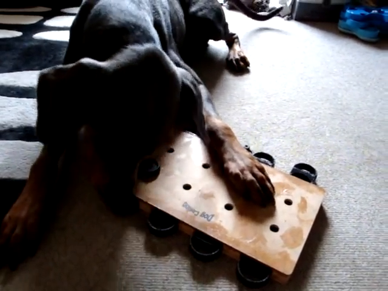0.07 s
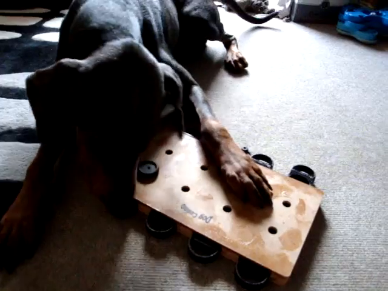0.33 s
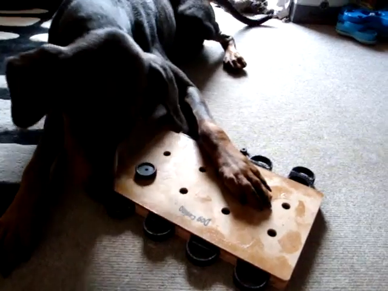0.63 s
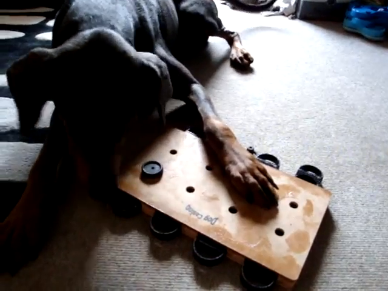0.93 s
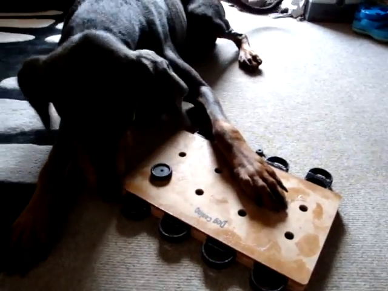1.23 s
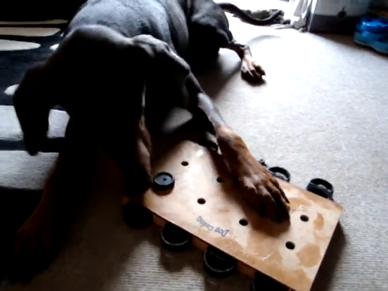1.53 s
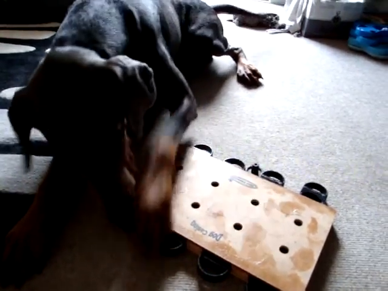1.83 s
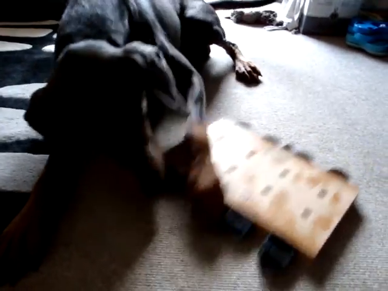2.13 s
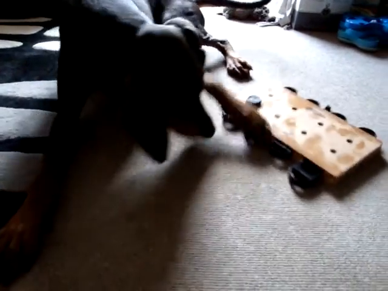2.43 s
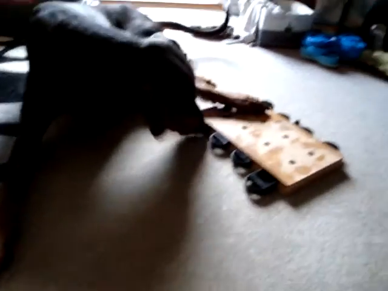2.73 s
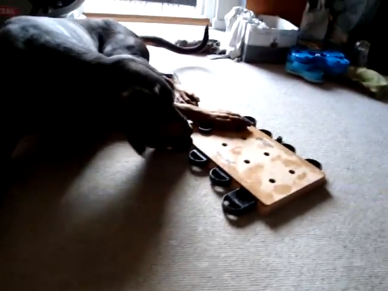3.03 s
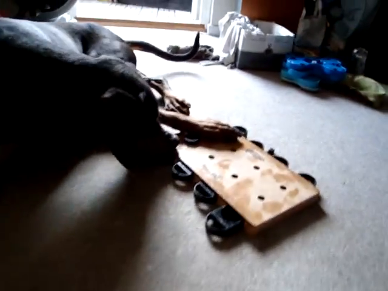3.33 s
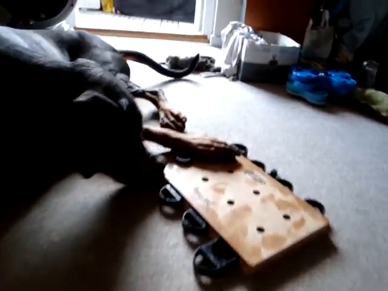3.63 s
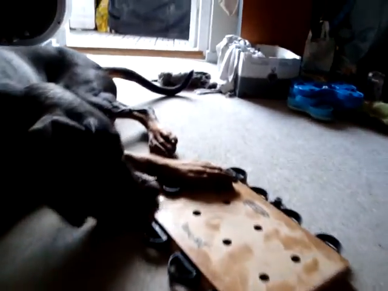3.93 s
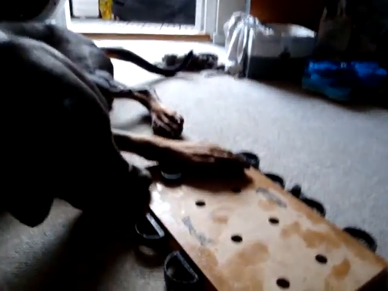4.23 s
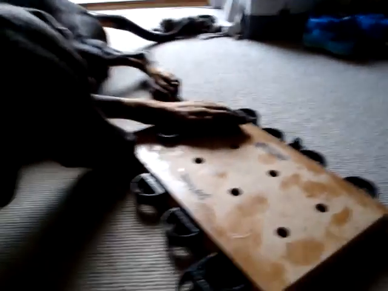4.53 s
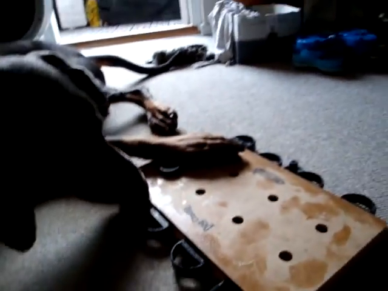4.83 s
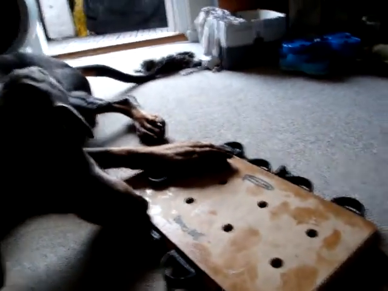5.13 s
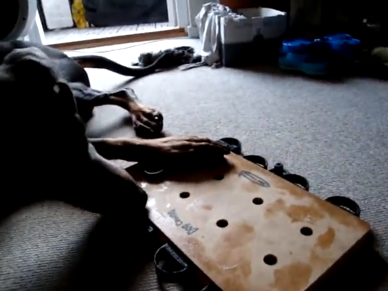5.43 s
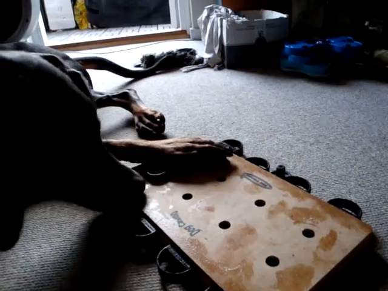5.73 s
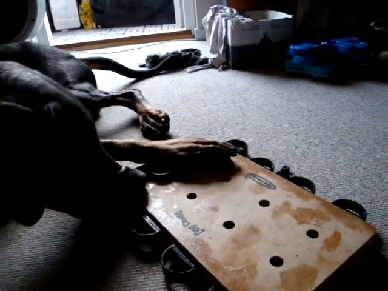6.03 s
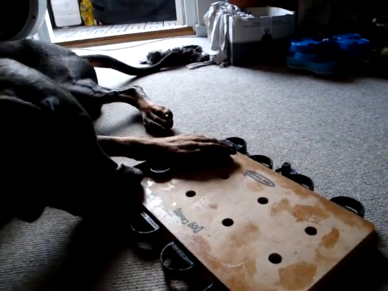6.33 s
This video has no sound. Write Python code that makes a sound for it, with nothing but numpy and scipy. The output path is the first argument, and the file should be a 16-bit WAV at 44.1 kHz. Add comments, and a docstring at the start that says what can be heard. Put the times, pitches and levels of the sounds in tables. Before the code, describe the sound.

A dog works at a wooden treat puzzle close by in a small carpeted room, over a faint steady hiss. In the first second there is a soft puff of breath and a few light clicks of plastic drawers against the board. A very faint, falling nose whistle comes at about 1.1 seconds, then snuffles around 1.5. Near 1.9 seconds a paw swipe makes a sharp snap and sets a plastic cup ringing briefly. The board slides over the carpet with a low rumble and a loud clatter of drawers until about 2.5 seconds, followed by soft paw brushes. Two hard snaps come at 3.2 and 3.5 seconds, and a cluster of knocks just after 4. Sparser clicks follow, with quiet snuffles around 5.4. Another snap at 6 seconds leads into a puff of breath and several more clicks, up to about 6.5 seconds.

```python
"""A dog works at a wooden treat puzzle on the carpet of a small room.
First it snuffles, clicks the plastic drawers against the board with its nose, and whistles faintly.
Near 2 s a paw swipe rings a plastic cup and shoves the board away with all drawers rattling.
The carpet stops the board, paws brush the pile, and the clicks and snuffles go on to the end.
A limiter briefly turns the sound down on the hardest snaps; a faint hiss lies under it all."""
import sys
import numpy as np
from scipy import signal
from scipy.fft import rfft, irfft
from scipy.io import wavfile
from scipy.ndimage import uniform_filter1d, minimum_filter1d

SR = 44100
rng = np.random.default_rng(int(sys.argv[2]) if len(sys.argv) > 2 else 0)


def wav_out(sig):
    """Save sig, one row per channel (or a flat mono array), as 16-bit PCM at SR to the path in sys.argv[1]."""
    wavfile.write(sys.argv[1], SR, np.round(np.clip(np.atleast_2d(sig).T, -1, 1) * 32767).astype(np.int16))


N = 285768

# Drawers knocking on the board. Body is the low part of a knock, compared with its main ring.
# start_s, pitch_hz, level_db, body_db, hardness_db_per_octave
DRAWER_KNOCKS = [(0.338, 1520, -66.5, 15.5, 5), (0.507, 1453, -31, -0.5, -8),
                 (0.6312, 1440, -40.5, -6.5, -9), (0.641, 1300, -33.5, -10, -14.5),
                 (0.8807, 1532, -32.5, -9.5, -7.5), (0.9546, 1466, -38.5, -11, -13),
                 (0.9664, 1354, -34, -6.5, -13), (1.8722, 1600, -34, -5, -10), (1.893, 1510, -29.5, 3.5, 4),
                 (1.899, 1534, -35.5, -13, 2.5), (1.935, 1540, -36.5, -20, -2),
                 (1.9727, 1430, -31.5, 4.5, -15), (2.0322, 1543, -27, -0.5, -7.5),
                 (2.0582, 1400, -30, 4, 2.5), (2.0693, 1266, -17.5, -4, -3.5),
                 (2.0771, 1454, -26.5, 3, 2.5), (2.0839, 1490, -41, 4, 0), (2.1001, 1217, -34.5, 13.5, -15),
                 (2.1199, 1350, -31.5, 5, -1), (2.1647, 1330, -27, 2, -7), (2.1933, 1310, -32.5, -2, -2.5),
                 (2.1991, 1790, -17.5, -2, -8), (2.2133, 1590, -26.5, -8, -7.5),
                 (2.2813, 1234, -37, 4.5, -15), (2.3155, 1448, -24.5, 0, -24),
                 (2.372, 1294, -38.5, 4.5, -18), (2.452, 1160, -27, -16.5, -12),
                 (2.459, 1596, -24.5, -12, -10.5), (2.4636, 1507, -28, -13, -15),
                 (2.483, 1350, -35.5, -4.5, -14), (2.643, 1350, -35, 5.5, -0.5),
                 (2.6655, 1537, -30, -15, -5.5), (2.7474, 1500, -29, -16, -5.5),
                 (3.0743, 1313, -39, -5, -15.5), (3.179, 1220, -44, -8, 0), (3.343, 1270, -50, -2, -16),
                 (3.361, 1446, -31, -15, -13), (3.366, 1458, -24.5, -27, -12),
                 (3.3717, 1335, -31, -8, -10.5), (3.425, 1310, -49, 9, -3), (3.758, 1494, -55, 10, -2),
                 (3.79, 1500, -52, 7.5, -9), (3.9543, 1516, -31.5, -17, -0.5),
                 (3.967, 1430, -43.5, 8.5, -15), (4.008, 1430, -41.5, 3, -13), (4.025, 1446, -32, -1, -3.5),
                 (4.1147, 1428, -17, -7, -9.5), (4.1283, 1426, -22.5, -26, -7),
                 (4.1762, 1434, -31.5, -10, -13), (4.2391, 1490, -26, -17.5, -14.5),
                 (4.4941, 1490, -31.5, -11.5, -6), (4.5358, 1357, -43.5, -4, -8),
                 (4.9853, 1630, -24, -14.5, -2.5), (5.0972, 1210, -47, 2.5, 1),
                 (5.1066, 1435, -35, -4.5, -12.5), (5.4558, 1440, -33, 1, -7.5),
                 (5.85, 1354, -53, 10.5, -6), (5.9869, 1500, -53, 11, -8), (6.047, 1375, -32, -13, -6),
                 (6.1058, 1425, -37.5, -4.5, -9.5), (6.2919, 1440, -22, -11.5, -15.5),
                 (6.3657, 1330, -30.5, 0, -0.5), (6.4614, 1390, -32, -7.5, -19),
                 (6.4757, 1460, -34, -15, -30)]
# Drawers snapping hard against their stops: same columns.
DRAWER_SNAPS = [(1.8769, 1495, -16.5, -3, 2.5), (3.183, 1361, -15, -8, 0), (3.4994, 1409, -16, -9, -0.5),
                (6.0304, 1530, -23.5, -8, 3.5)]
def drawers():
    """All the knocks and snaps, as they sound in one direction."""
    out = np.zeros(N)
    for start_s, pitch_hz, level_db, *blow in DRAWER_KNOCKS:
        tone = blow_tone(*blow, clack_db=2.5, tick_db=-5.5)
        hit = knock(pitch_hz, level_db, tone, crack_db=2.5, crack_s=0.0022, press_s=0.00029, touch_db=-17)
        add(out, start_s - TOUCH_SAMPLES / SR, hit)
    for start_s, pitch_hz, level_db, *blow in DRAWER_SNAPS:
        tone = blow_tone(*blow, clack_db=0.5, tick_db=1)
        hit = knock(pitch_hz, level_db, tone, crack_db=8.5, crack_s=0.0019, press_s=0.00014, touch_db=-20)
        add(out, start_s - TOUCH_SAMPLES / SR, hit)
    return out


def blow_tone(body_db, hardness, clack_db, tick_db, tick_octaves=1.37):
    """Levels of a blow's body, ring, clack and tick, low to high: harder blows are brighter."""
    return np.array([body_db, 0, clack_db + hardness, tick_db + tick_octaves * hardness])


TOUCH_SAMPLES = 130  # from a drawer's first touch to its blow
# Borders of the body, ring, clack and tick bands: edge_hz
KNOCK_BANDS = [330, 1050, 2000, 4200, 10500]
# The tones a drawer rings with, main one first: pitch_hz, level_db, ring_s (time to fade by 60 dB)
DRAWER_TONES = [(1447, 7.5, 0.024), (408, -14, 0.014), (617.4, -5.5, 0.044), (710, -8.5, 0.031),
                (868, -2.5, 0.041), (986.4, -4, 0.049), (1176, -0.5, 0.021), (1746, 1.5, 0.018),
                (1955, -1.5, 0.014), (2288, 2, 0.016), (2566, 4.5, 0.014), (2922, 3.5, 0.016),
                (3373, -5.5, 0.028), (3780, 5.5, 0.0081), (4397, 2.5, 0.012), (5396, 5, 0.0083),
                (6700, -33, 0.0059), (7860, -1, 0.009)]
def knock(pitch_hz, level_db, tone_db, crack_db, crack_s, press_s, touch_db, size=1918):
    """A loose drawer touches lightly, then lands with a short crack and rings."""
    t = np.arange(size) / SR
    crack = signal.lfilter([1], [1, -.45], rng.standard_normal(size)) * np.exp(-t / crack_s)
    tuned = np.array(DRAWER_TONES) * [pitch_hz / DRAWER_TONES[0][0], 1, 1]
    rings = ring(tuned, spread_db=2.5, detune=0.043, size=size)
    press = 1 - np.exp(-t / press_s)  # the force builds up as the parts meet
    hit = np.pad(press * (rings + amp(crack_db) * crack), (TOUCH_SAMPLES, 0))
    add(hit, 0, amp(touch_db) * rings * np.minimum(t * SR / TOUCH_SAMPLES, 1))
    # Split the hit into four bands of equal energy, then give each its level.
    hz = np.fft.rfftfreq(len(hit), 1 / SR)
    low_passes = [1 / (1 + (hz / edge_hz) ** 8) for edge_hz in KNOCK_BANDS]
    bands = irfft(rfft(hit) * np.diff(low_passes, axis=0), len(hit))
    bands /= np.sqrt((bands ** 2).sum(1, keepdims=True) / (.01 * SR))
    return amp(level_db + tone_db) @ bands


# The low tones of the whole board on the carpet: pitch_hz, level_db, ring_s
BOARD_TONES = [(85.6, -24.5, 0.11), (112, -12.5, 0.073), (151.6, 2, 0.1), (206.7, 0, 0.31), (260, 0, 0.071),
               (301.6, 5.5, 0.077), (341, 5, 0.12), (378.6, 8.5, 0.074), (415, 1, 0.084)]
def board(stir_db=-27, thud_db=-28.5, thud_s=0.0016):
    """Knocks set the board ringing faintly; hard snaps give it a dull push."""
    out = np.zeros(N)
    low_ring = ring(BOARD_TONES, spread_db=0, detune=0.029)
    for start_s, _, level_db, body_db, _ in DRAWER_KNOCKS:
        add(out, start_s, amp(level_db + body_db + stir_db) * low_ring)
    t = np.arange(SR // 10) / SR
    for start_s, *_ in DRAWER_SNAPS:
        add(out, start_s, -amp(thud_db) * np.exp(-t / thud_s))
    return out


# Jolts that shake the loose drawers: peak_s, fade_s, level_db
DRAWER_JOLTS = [(1.616, 0.017, -43.5), (1.897, 0.014, -38), (2.05, 0.055, -22.5), (2.2, 0.035, -27.5),
                (2.465, 0.048, -31), (2.69, 0.041, -40)]
# The rattle's tone, low to high: pitch_hz, level_db
RATTLE_SPECTRUM = [(200, -23), (400, -13), (530, -21), (640, 3.5), (850, 12), (1200, 6), (1700, -1),
                   (2200, -3), (2750, -0.5), (3500, -5), (6000, -23), (10000, -7)]
def shove(speed, rumble_db=-32.5, rattle_db=-33):
    """The sliding board rumbles and its drawers rattle, more with speed and at each jolt."""
    judder = patter(BOARD_TONES, per_s=300, spread_db=3, detune=.012, spots=5)
    chatter = patter(DRAWER_TONES, per_s=500, spread_db=5, detune=.07, spots=9)
    jolts = sum(amp(level_db) * swell(peak_s, 0.44 * fade_s, fade_s, roundness=1.05)
                for peak_s, fade_s, level_db in DRAWER_JOLTS)
    rumble = colour(judder, [(30, -31), (70, -5), (120, -2), (270, -8), (430, -4), (600, -4), (1200, -9)])
    rattle = colour(chatter, RATTLE_SPECTRUM)
    return rumble * amp(rumble_db) * speed ** 0.46 + rattle * (amp(rattle_db) * speed + jolts)


def slide_speed(start_s=1.962, push_s=0.059, stop_s=2.388):
    """The board's speed, from 0 to 1: the paw speeds it up, then the carpet brakes it."""
    return np.interp(np.arange(N) / SR, [start_s, start_s + push_s, stop_s], [0, 1, 0])


# Paws and legs brushing the carpet: peak_s, rise_s, level_db
PAW_BRUSHES = [(1.926, 0.013, -35.5), (2.418, 0.023, -35.5), (2.502, 0.076, -47.5), (2.619, 0.016, -39.5),
               (2.685, 0.048, -44)]
# The tone of rubbed carpet: pitch_hz, level_db
CARPET_SPECTRUM = [(700, -15), (1500, -0.5), (2500, -3.5), (4000, -4.5), (6000, -10), (8000, -11),
                   (10000, -18.5)]
def carpet_rub(speed, slide_db=-37):
    """The carpet hisses as the board and the paws rub over it."""
    brushes = sum(amp(level_db) * swell(peak_s, rise_s, rise_s, roundness=3.3)
                  for peak_s, rise_s, level_db in PAW_BRUSHES)
    return noise(CARPET_SPECTRUM) * (amp(slide_db) * speed ** 0.12 + brushes)


# The tones of a plastic cup: pitch_hz, level_db, ring_s
CUP_TONES = [(1030, -11, 0.15), (2620, -3, 0.17), (2640, 0, 0.18), (3380, -12, .14)]
def cup(swipe_s=1.879, level_db=-22):
    """The paw's first swipe leaves a cup ringing."""
    out = np.zeros(N)
    add(out, swipe_s, amp(level_db) * ring(CUP_TONES, spread_db=5, detune=0.0024))
    return out


# Puffs of breath: peak_s, rise_s, flow_db, hiss_db
NOSE_PUFFS = [(0.006, 0.076, -46, -57.5), (1.376, 0.034, -48.5, -53.5), (1.46, 0.14, -52, -58),
              (1.612, 0.016, -34.5, -47), (1.807, 0.013, -49, -48), (5.23, .06, -49.5, -58),
              (5.374, 0.087, -43.5, -56), (5.509, 0.03, -47, -60), (6.194, 0.021, -46, -51.5)]
# The tone of air flowing in the muzzle, and hissing in the nostrils: pitch_hz, level_db
MUZZLE_SPECTRUM = [(88, -48), (150, -13), (266, -5), (336, -4.5), (431, -12), (670, -0.5), (925, -1),
                   (1060, 0), (1340, 0.5), (2230, -4), (2780, -1.5), (5000, -13.5), (6500, -43),
                   (11000, -120)]
NOSTRIL_SPECTRUM = [(2500, -34), (4200, 0.5), (6000, -5), (8000, -5), (10000, -13)]
def snuffles(flutter_db=2.4):
    """Puffs of air flutter through the dog's nose, pressed against the board."""
    flutter = amp(flutter_db * wobble(smooth_samples=400))
    flow, hiss = noise(MUZZLE_SPECTRUM), noise(NOSTRIL_SPECTRUM)
    out = np.zeros(N)
    for peak_s, rise_s, flow_db, hiss_db in NOSE_PUFFS:
        puff = swell(peak_s, rise_s, 1.12 * rise_s, roundness=1.66)
        out += puff * (amp(flow_db) * flow + amp(hiss_db) * hiss)
    return flutter * out


def nose_whistle(peak_s=1.09, rise_s=.075, pitch_hz=1770, sag_hz_per_s=850, waver_hz=25, level_db=-56):
    """A thin tone in the dog's nose sinks as the air runs out."""
    hz = pitch_hz - sag_hz_per_s * (np.arange(N) / SR - peak_s)
    hz += waver_hz * wobble(smooth_samples=300)
    tone = np.sin(2 * np.pi * np.cumsum(hz) / SR)
    return amp(level_db) * swell(peak_s, rise_s, rise_s, roundness=2) * tone


# How long the room rings: pitch_hz, ring_s
ROOM_RING = [(150, 0.085), (600, 0.27), (1500, 0.23), (3500, 0.26), (9000, 0.46)]
# Echoes off the floor and furniture: delay_s, level_db
NEAR_ECHOES = [(.0042, -20), (0.011, -41), (0.0154, -38)]
def room(direct, sides, tail_db=-15.5, build_s=0.0035):
    """A few near echoes; sound sent sideways returns as a short tail, dulled by the carpet."""
    shape = (len(sides), SR // 2)
    bounces = rng.standard_normal(shape) * (rng.random(shape) < .3)
    hz, t, spectrum = signal.stft(bounces, SR, nperseg=256)
    dulling = amp(curve([(100, 11), (1200, 5), (3000, 2.5), (6000, -7), (10000, -18.5)], hz))
    fade = amp(-60 * t / curve(ROOM_RING, hz)[:, None])
    tails = signal.istft(spectrum * dulling[:, None] * fade, SR, nperseg=256)[1]
    tails *= 1 - np.exp(-(np.arange(tails.shape[1]) / SR / build_s) ** 2)
    tails *= amp(tail_db) / np.linalg.norm(tails)
    out = direct + signal.oaconvolve(sides, tails, axes=1).sum(0)[:N]
    for delay_s, level_db in NEAR_ECHOES:
        add(out, delay_s, amp(level_db) * direct)
    return out


# The tone of the quiet background: pitch_hz, level_db
BACKGROUND_SPECTRUM = [(7.1, -48), (12, -18), (43, -25), (65, -13), (174, -3), (224, -6.5), (440, -4),
                       (479, -2.5), (751, -2.5), (968, -5.5), (1050, -4), (1700, -6), (2190, -8.5),
                       (5090, -12), (10000, -19), (13000, -64.5), (22000, -120)]
def background_hiss(level_db=-54.5):
    """A faint, steady hiss."""
    return amp(level_db) * noise(BACKGROUND_SPECTRUM)


def ring(tones, spread_db, detune, size=6000):
    """One blow: where it lands sets the strength, sign and exact pitch of each fading tone."""
    hz, level_db, ring_s = np.transpose(tones)[:, :, None]
    strength, side, pitch = rng.standard_normal((3, len(tones), 1))
    t = np.arange(size) / SR
    fades = amp(level_db + spread_db * strength - 60 * t / ring_s)
    waves = np.sin(2 * np.pi * hz * (1 + detune * pitch) * t)
    return (np.sign(side) * fades * waves).sum(0)


def patter(tones, per_s, spread_db, detune, spots):
    """Many small blows of uneven size, landing on several spots."""
    out = np.zeros(N)
    for _ in range(spots):
        lands = rng.random(N) < per_s / spots / SR
        blows = lands * amp(spread_db * np.clip(rng.standard_normal(N), -2, 2))
        out += signal.oaconvolve(blows, ring(tones, spread_db=2.5, detune=detune))[:N]
    return unit(out)


def swell(peak_s, rise_s, fall_s, roundness):
    """A volume that rises to 1 and falls away; roundness 1 is a spike, 2 a bell shape."""
    t = np.arange(N) / SR - peak_s
    return np.exp(-np.minimum(abs(t / np.where(t < 0, rise_s, fall_s)) ** roundness, 20))


def wobble(smooth_samples):
    """A random wander around zero."""
    return unit(uniform_filter1d(rng.standard_normal(N), size=smooth_samples))


def noise(spectrum):
    """Steady noise with the given tone."""
    return colour(rng.standard_normal(N), spectrum)


def colour(x, spectrum):
    """Shapes a sound's lows and highs by (pitch_hz, level_db) points, at average level 1."""
    gains = amp(curve(spectrum, np.fft.rfftfreq(len(x), 1 / SR)))
    return unit(irfft(rfft(x) * gains, len(x)))


def curve(points, hz):
    """Joins (pitch_hz, value) points with lines, on an axis spaced in octaves."""
    pitch_hz, value = np.transpose(points)
    return np.interp(np.log(hz + 1), np.log(pitch_hz + 1), value)


def amp(db):
    """Turns decibels into a multiplier."""
    return np.exp(np.asarray(db) * (np.log(10) / 20))


def unit(x):
    """Scales to an average level (rms) of 1."""
    return x / np.sqrt(np.mean(x ** 2) + 1e-20)


def add(mix, start_s, sound):
    """Mixes a sound in at a given time."""
    part = mix[max(round(start_s * SR), 0):][:len(sound)]
    part += sound[:len(part)]


def scene():
    """Puzzle and dog in the room; the drawers sound a little different in each of three directions."""
    speed = slide_speed()
    near = board() + cup() + snuffles() + shove(speed) + carpet_rub(speed)
    directions = np.array([near + drawers() for _ in range(3)])
    return (room(directions[0], directions[1:]) + background_hiss() + nose_whistle())[None]


def record(dry, ceiling_db=-6, recover_db_per_s=330, cutoff_hz=10150):
    """A fast limiter turns loud peaks down and recovers; then the highest treble is cut."""
    over_db = np.maximum(20 * np.log10(abs(dry[0]) + 1e-9) - ceiling_db, 0)
    recovery_db = np.arange(N) * recover_db_per_s / SR
    dip_db = np.maximum.accumulate(over_db + recovery_db) - recovery_db
    dip_db = uniform_filter1d(-minimum_filter1d(-dip_db, size=15), size=27)  # ease in before the peak
    low_pass = signal.firwin(401, cutoff_hz, window=("kaiser", 8), fs=SR)
    return signal.oaconvolve(dry / amp(dip_db), low_pass[None], "same")


dry = scene()
out = record(dry)
wav_out(out)
```